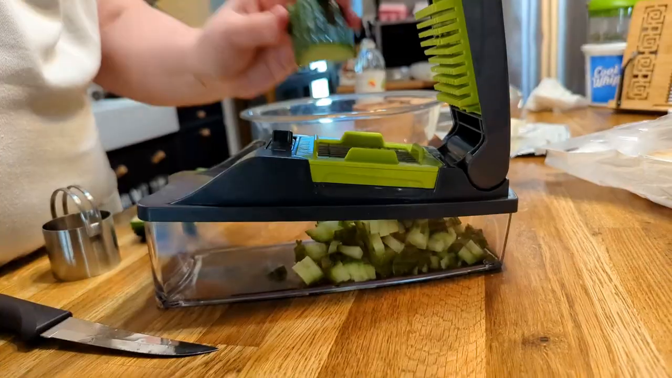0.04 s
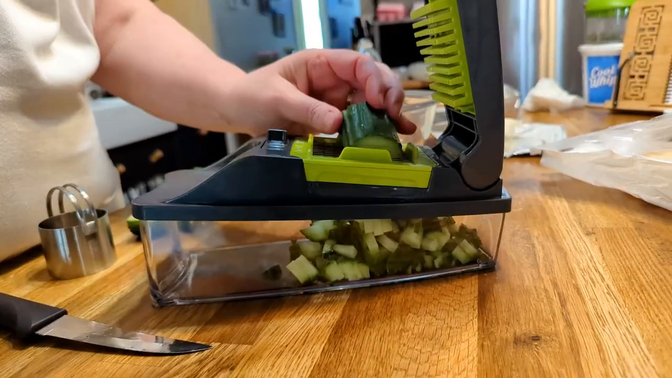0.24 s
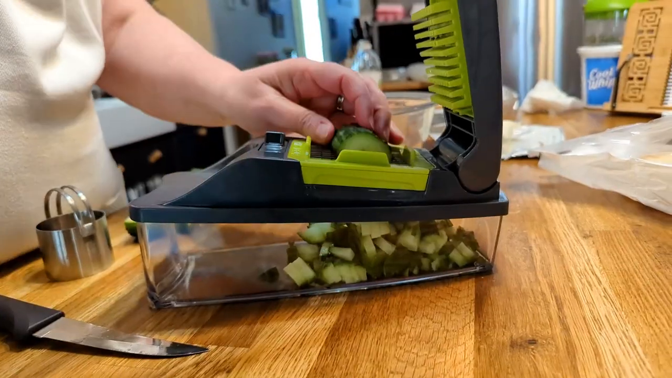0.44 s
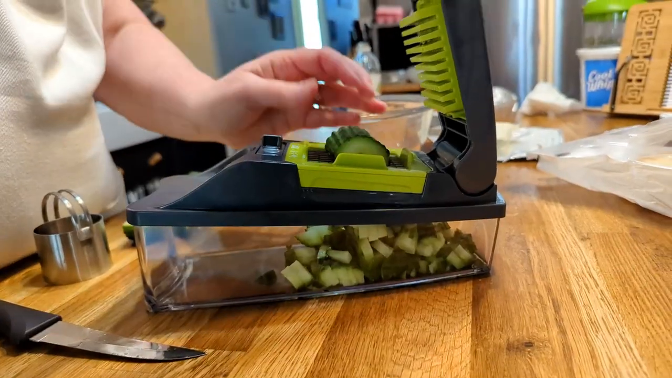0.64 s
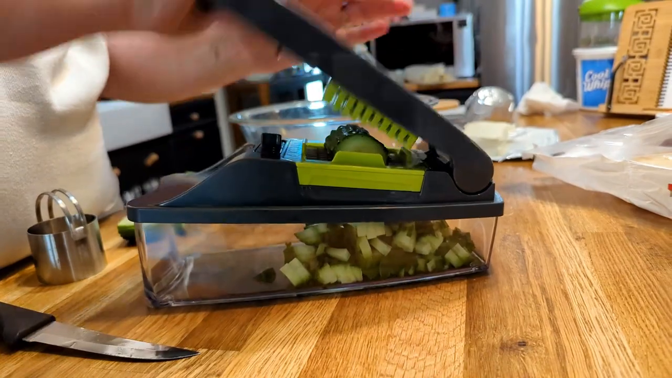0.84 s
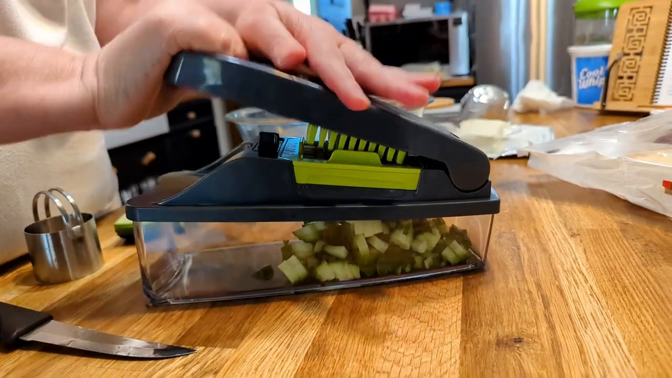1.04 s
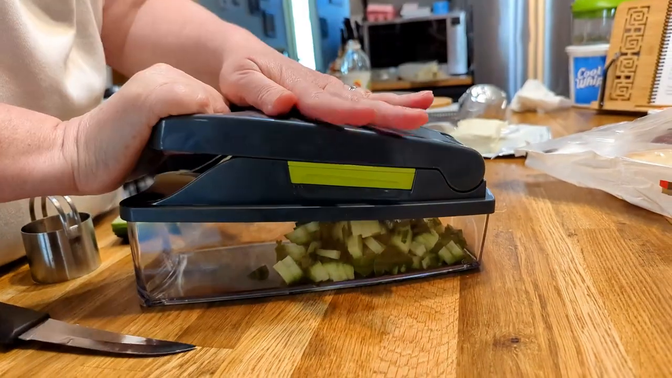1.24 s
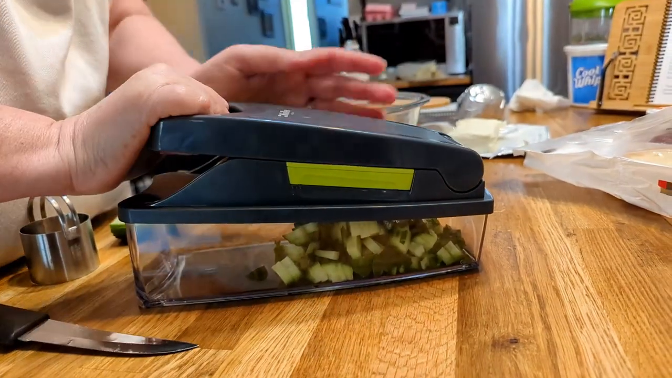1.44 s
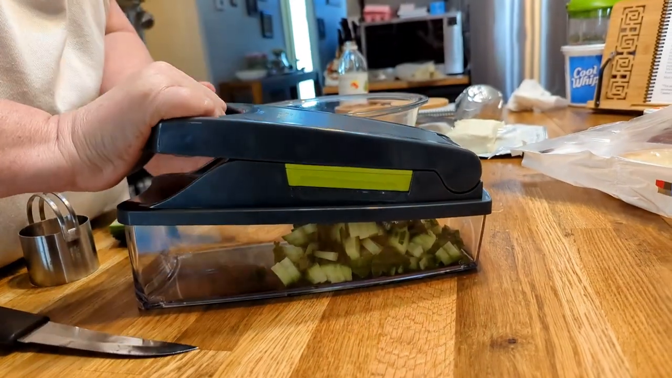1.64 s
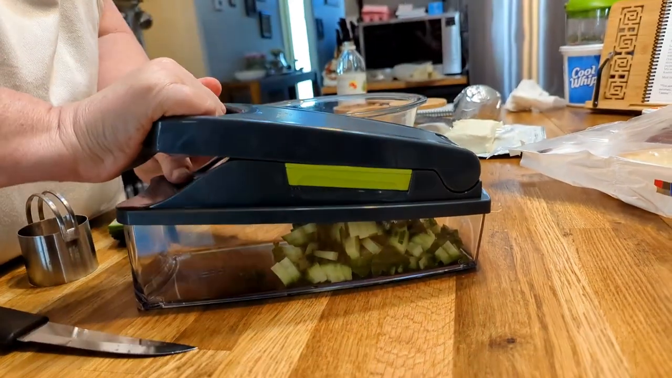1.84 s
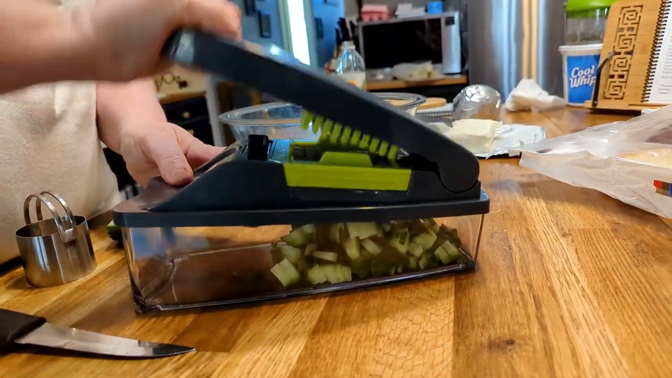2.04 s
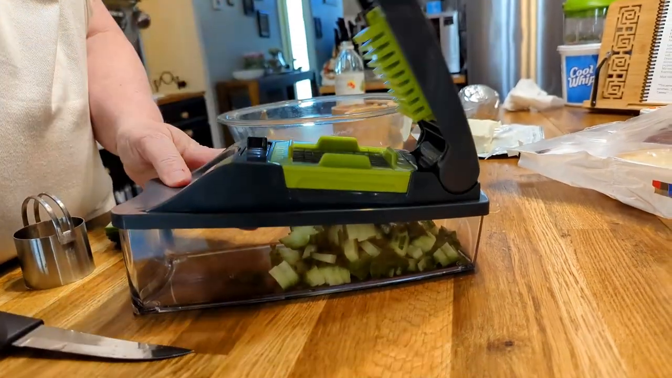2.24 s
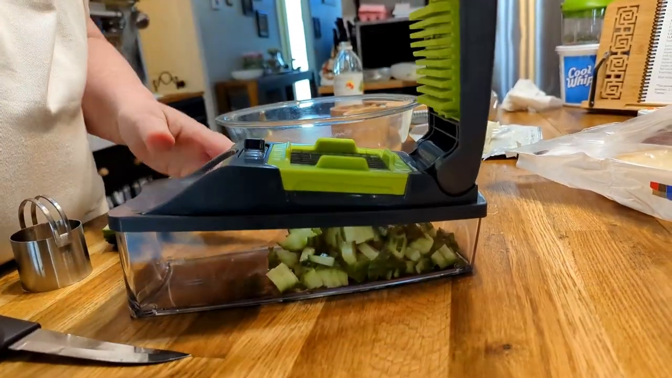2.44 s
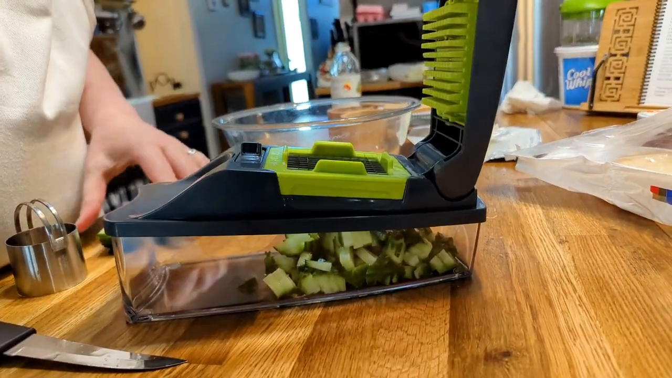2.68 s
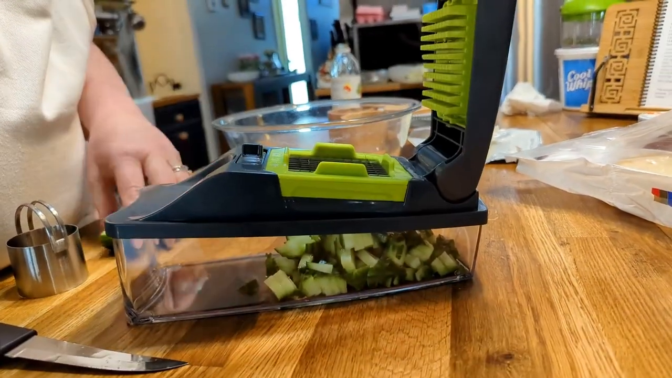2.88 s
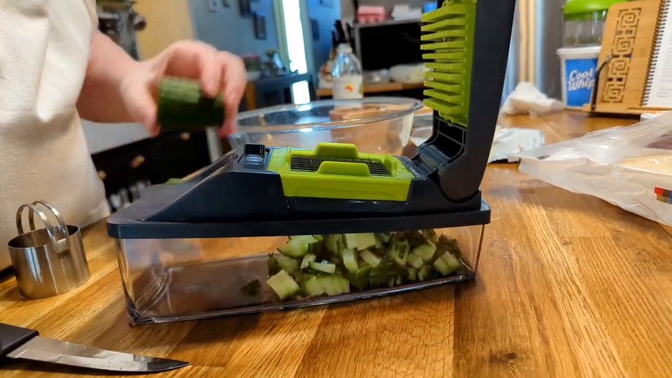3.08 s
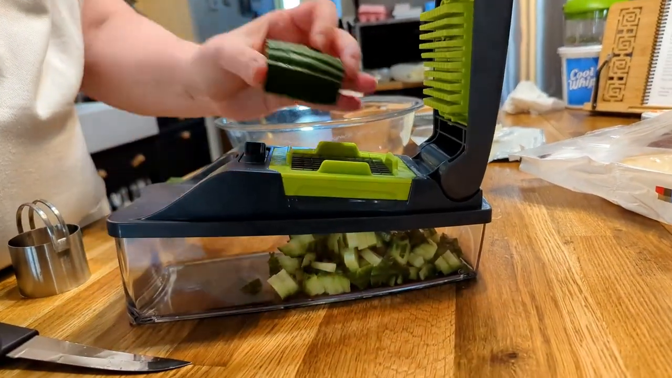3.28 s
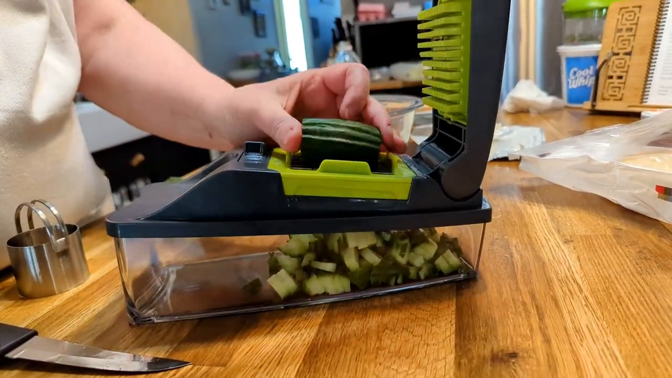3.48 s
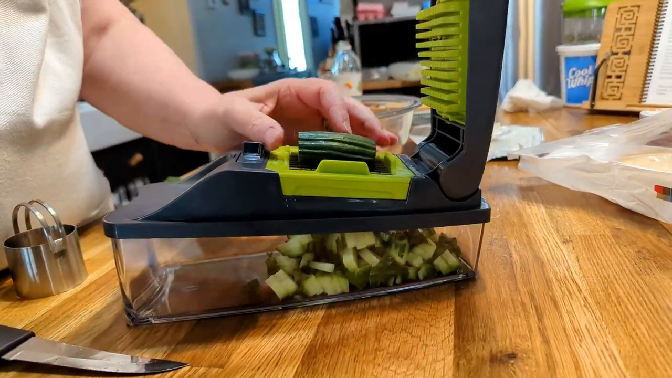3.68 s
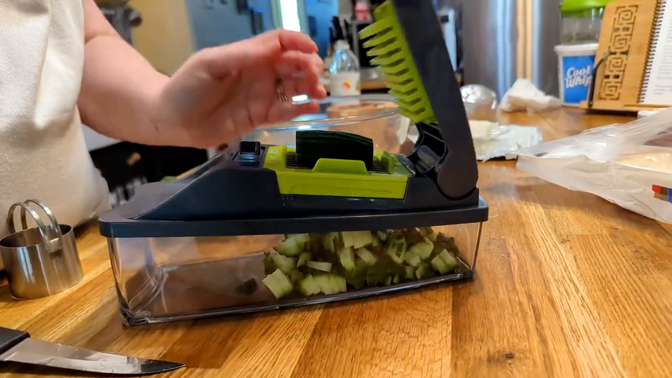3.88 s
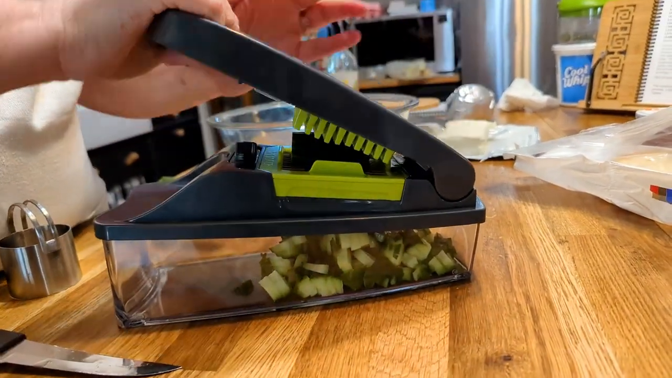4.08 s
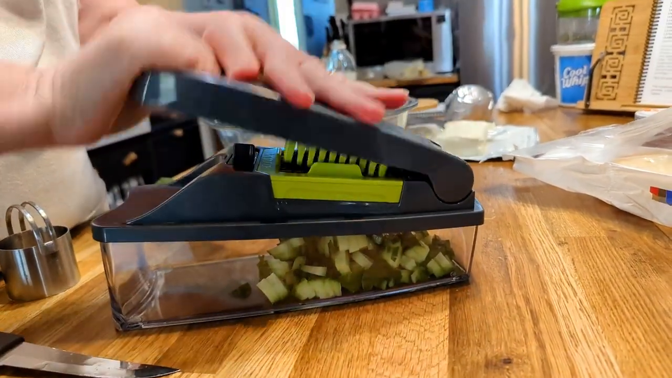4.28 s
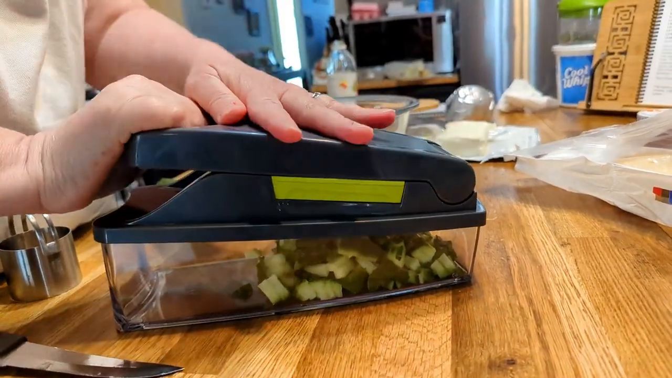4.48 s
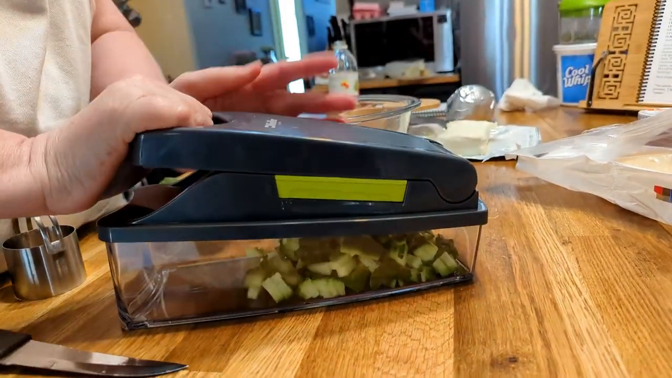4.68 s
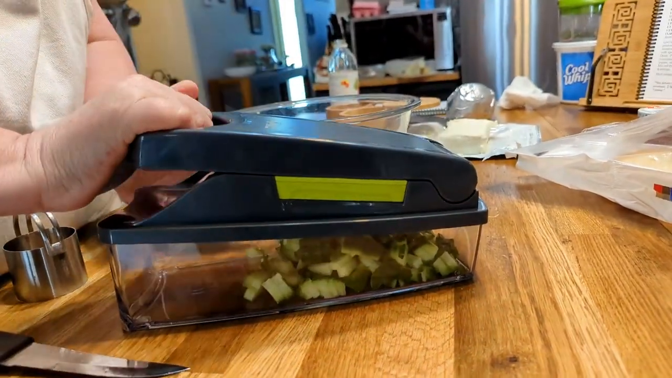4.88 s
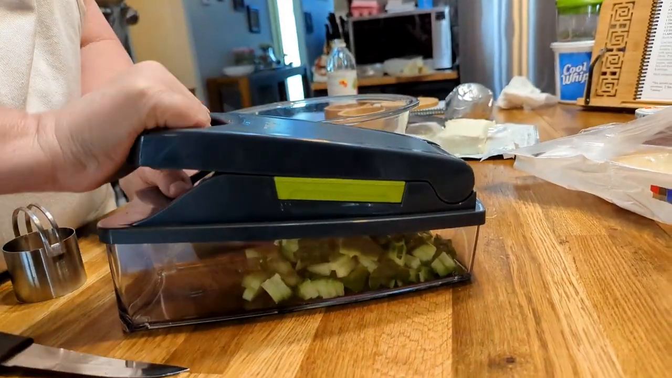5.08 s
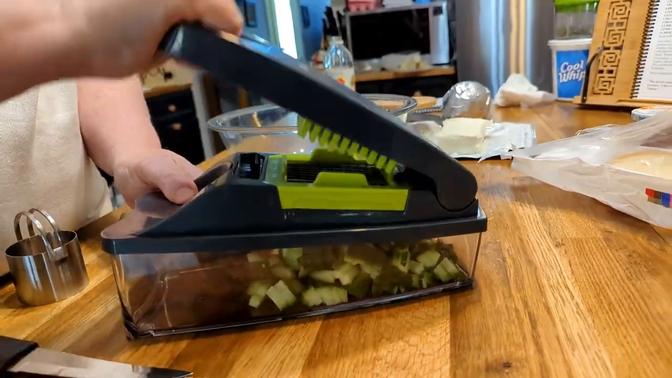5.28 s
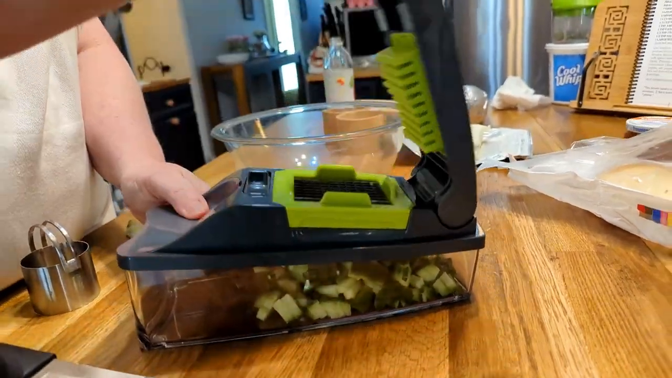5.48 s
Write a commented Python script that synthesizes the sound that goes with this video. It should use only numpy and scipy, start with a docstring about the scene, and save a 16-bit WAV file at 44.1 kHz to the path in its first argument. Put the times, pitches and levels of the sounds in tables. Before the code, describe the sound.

Light cucumber taps, clattering lid and crisp crunch into a hollow tub, then the same cycle again, harder, with a small steel ping between.

```python
"""A plastic lid-press dicer crunches through two pieces of cucumber on a wooden kitchen counter.
Force-driven grains of noise form each crunch; decaying noise bursts form the clacks of cucumber, lid and hinge.
Rubbing and shuddering are softer trains of grains. The hollow tub resonates under every contact.
Decaying sines form one steel ping and a softly singing bowl; nearby surfaces reflect the dicer.
The kitchen adds a diffuse tail, over steady ventilation noise and appliance hum."""
import sys
import numpy as np
from scipy import signal
from scipy.fft import rfft, irfft
from scipy.io import wavfile

SR = 44100
rng = np.random.default_rng(int(sys.argv[2]) if len(sys.argv) > 2 else 0)


def transcribe(signal):
    """Save signal, clipped to [-1, 1], as a 16-bit WAV file at the path in sys.argv[1]."""
    frames = np.atleast_2d(signal).T
    limited = np.clip(frames, -1, 1)
    pcm = np.round(limited * 32767).astype(np.int16)
    wavfile.write(sys.argv[1], SR, pcm)


N = 243431

# Ventilation noise: (frequency [Hz], relative density [dB per Hz]); its overall rms level [dB]
AIR_SPECTRUM = [(15, -73), (25, -36.5), (59, -17.5), (127, -6), (206, -10.5), (301, -10), (394, -18),
                (439, -10), (489, -18), (734, -16), (840, -25), (1400, -25), (2990, -33.5), (16000, -50.5)]
AIR_DB = -61
# Appliance hum: (frequency [Hz], rms level [dB])
HUM_TONES = [(119.5, -70.5), (222, -84.5), (442, -84), (725, -75.5)]
# Kitchen decay: (frequency [Hz], T60 [s])
KITCHEN_DECAY = [(100, 0.5), (400, 0.49), (1200, 0.51), (3000, 0.65), (6000, 0.54), (12000, 0.24)]
# Correlation of the two channels: (frequency [Hz], correlation [0-1])
CHANNEL_LIKENESS = [(150, .995), (330, .9), (600, .58), (1100, .1), (3000, .03), (12000, .03)]
# Early reflections from counter and worktop things: (delay [s], left gain [ratio], right gain [ratio])
EARLY_REFLECTIONS = [(.0009, 0.38, -0.022), (.0016, -0.13, 0.19), (.0034, .22, -0.097), (.0052, .1, .22),
                     (0.0115, 0.21, .15)]
# A bowl on the counter singing after each chop: (time [s], level [dB])
BOWL_TONES = [(1.2, -40.5), (4.42, -50.5)]
BOWL_HZ, BOWL_T60 = 524, 1.58  # Hz, s
# Modes of the ringing steel: (frequency [Hz], relative level [dB], T60 [s], left-right difference [dB])
STEEL_MODES = [(1387, -2, .72, 11), (2494, -11, .14, 2), (2556, -1, .22, 3), (2657, -9, .12, 2),
               (4024, -13, .38, -2), (5612, -6, .38, -2), (6198, -15, .2, 0), (7048, -11, .3, 3),
               (7262, -12, .2, 3), (7379, -9, .24, 3), (7773, -14, .16, 0), (8778, -17, .22, 0),
               (9130, -20, .22, 0), (10030, -24, .2, 0), (11798, -18, .2, 0)]
PING_AT, PING_DB = 3.847, -30  # s, dB
# Modes of the hollow tub and lid: (frequency [Hz], relative gain [dB], T60 [s])
TUB_MODES = [(68.5, 0, 0.36), (163.2, 2.5, 0.28), (223.2, -4, 0.34), (293.9, 5, 0.17), (364.4, 0.5, 0.25),
             (547, -2, 0.16), (640, -6.5, 0.55), (682, -1.5, 0.21), (702, -12, 0.033), (767, -13, 0.62),
             (855, -32, 0.3), (954, -16.5, 0.043), (1210, -23.5, 0.39), (1539, -10.5, 0.017),
             (1910, -14, 0.15)]

# Spectra of the contact voices, low to high: (frequency [Hz], relative density [dB per Hz])
BOOM_VOICE = [(20, -39.5), (35, -26.5), (52, -3.5), (78, 1.5), (100, -3), (160, 3), (230, -1.5),
              (400, -29.5), (1200, -61.5)]
THUD_VOICE = [(25, -59), (100, -45), (170, -15.5), (240, -6), (310, -1.5), (480, 0.5), (700, -9.5),
              (1200, -38), (3000, -70)]
CLACK_VOICE = [(150, -48.5), (400, -11), (600, 0.5), (1000, 0), (1450, 0), (2000, -4.5), (3000, -13.5),
               (5000, -22), (9000, -44.5)]
SNAP_VOICE = [(700, -42), (1800, -1.5), (3000, 7), (4500, 2), (6400, -1), (8200, -7), (10200, -2.5),
              (13000, -2.5), (16000, -13.5)]
# Spectrum of tearing flesh: (frequency [Hz], relative density [dB per Hz])
CRUNCH_VOICE = [(150, -21.5), (420, -9.5), (570, 1.5), (760, -2), (1050, -9.5), (1280, -5), (2000, -12),
                (3200, -27.5), (5000, -31.5), (9000, -49.5)]

# In the contact tables, weight raises the thud, sharpness the snap and push the boom of the counter.
# All levels are relative; each voice has a further trim.
# Fingers and wet plastic rubbing:
# (time [s], length [s], strength [dB], weight [dB], sharpness [dB]); weight raises the boom too
RUB_STROKES = [(0.34, 0.1, -56, 0.5, -12), (0.856, 0.037, -51, -18, -19), (1.415, 0.11, -41, -15, -19.5),
               (1.791, 0.14, -71, 12.5, -10), (1.955, .07, -61.5, 8, -13), (2.438, 0.066, -58, -3, -4.5),
               (2.522, 0.055, -53, -16, -1.5), (2.656, 0.047, -64, -13, -4.5),
               (3.63, 0.13, -69.5, 13, -10.5), (4.257, .05, -53.5, -3.5, -2.5), (4.75, 0.069, -63, -6, -10),
               (4.998, .16, -67.5, 9, -11), (5.37, 0.13, -42.5, -6, -21)]
RUB_ARCH_DB = 5  # a stroke is this much softer at its ends, before its edges fade
# The dicer shuddering after a heavy blow:
# (time [s], length [s], strength [dB], weight [dB], push [dB])
SHUDDER_EVENTS = [(0.95, 0.14, -46, 14, 5.5), (1.31, 0.16, -38, 6, -4), (2.076, 0.14, -38.5, 11, 3),
                  (4.127, 0.16, -49, 4.5, 5), (5.285, 0.091, -31.5, 3.5, 0.5)]
SHUDDER_DB_PER_S = 66.5
# Hinge juddering as the lid swings:
# (time [s], strength [dB], weight [dB], sharpness [dB], push [dB])
HINGE_JUDDERS = [(0.879, -48.5, -22, -14, -28), (0.89, -47.5, -23.5, -15, -35), (2.24, -45.5, -19, -9, -25),
                 (2.292, -43.5, -24, -32, -27), (2.364, -53, -9, -11, -20),
                 (3.973, -33.5, -21.5, -8.5, -14.5), (4.052, -42.5, -30, -25, -35),
                 (5.415, -41.5, -21, -29, -18), (5.463, -38, -10.5, -22, -14)]
# Plastic knocks of lid and tub:
# (time [s], strength [dB], weight [dB], sharpness [dB], push [dB])
PLASTIC_KNOCKS = [(0.918, -37.5, -7, -18, -32), (0.928, -24.5, -5, -3, -18.5),
                  (0.935, -31.5, -10, -20, -18), (1.002, -37.5, -3, -10, -2), (1.142, -34, -13, -4, -17),
                  (1.154, -26.5, -11, 2, -19), (1.171, -36, -3, -2, -10), (1.19, -39, 5.5, -10, 2.5),
                  (1.242, -35, -8, -2, -7), (1.726, -60, -3.5, -5, -7), (1.808, -55, -1.5, -26.5, 0.5),
                  (1.845, -50.5, 2, -16, -0.5), (2.037, -36, 1, -10.5, -4), (2.044, -22, -3, -5.5, -11),
                  (2.064, -28, -1, -11, -22), (2.076, -29, -9, -15.5, -8.5), (2.144, -43.5, -1, -25, 5),
                  (2.814, -64, -5, -14, -25), (3.777, -57.5, -9.5, -24, -14.5),
                  (4.093, -24.5, -17, -12.5, -25.5), (4.109, -39, -16, -5.5, -34),
                  (4.187, -36.5, -2.5, -25, -6), (4.298, -33, 7.5, -16, -1.5), (4.32, -32, -17, -3, -23.5),
                  (4.366, -23, -16, -12, -27), (4.381, -16.5, -16, -2, -18), (4.416, -20.5, -2.5, -15, -7),
                  (4.434, -18.5, -3.5, -15, -9), (4.928, -59.5, -1, -2.5, -16), (5.137, -53, -15, -28, -6),
                  (5.24, -42, 5, -5, -10.5), (5.249, -25, -8.5, -9.5, -24), (5.274, -25, 0.5, -13, -6.5),
                  (5.305, -44, 2, -13, 10.5)]
# Cucumber bumping onto the blade grid:
# (time [s], strength [dB], weight [dB], sharpness [dB], push [dB])
CUCUMBER_BUMPS = [(0.166, -48, -17, -28, -16), (0.209, -43, -2.5, -9.5, -22), (0.22, -46, 1, -18, -16),
                  (0.275, -37.5, -7, -27, -32), (0.621, -52.5, 0.5, -24, -12),
                  (0.698, -43, -20.5, -22, -22), (3.428, -38, -9, -16, -38), (3.452, -34, -9, -9, -20),
                  (3.464, -26.5, -11, -14.5, -22), (3.473, -37, -3, -9.5, -26),
                  (3.613, -46.5, -5, -11.5, -3), (3.623, -45, -2.5, -26, -6)]
CHATTER_DOUBLES_DB = 45  # chatter lasts twice as long for this much less weight
# Below this pitch, each dB of negative weight also takes this many dB from the clack
LIGHT_HZ, LIGHT_DB_PER_DB = 700, 0.44
# Presses through a piece:
# (teeth meet skin [s], skin bursts [s], piece is through [s], force [dB], build-up [dB],
#  crispness [dB], push [dB])
PRESSES = [(1.083, 1.173, 1.2134, -23.5, 23.5, -7.5, -3), (4.287, 4.383, 4.4304, -15, 18.5, -11, -8)]
SNAP_DULLS_DB_PER_S, BOOM_SWELLS_DB_PER_S = 48, 92  # from the burst onward
EASE_DB_PER_S, EASE_S = 184, 0.11  # the force eases once the piece is through


def amp(db):
    """Level definition: amplitude gain is ten to the power of decibels over twenty."""
    return 10 ** (np.asarray(db) / 20)


def unit(x):
    """Mean-square normalisation: scales to rms 1."""
    return x / np.sqrt(np.mean(x ** 2) + 1e-20)


def read(points, hz):
    """Logarithmic frequency scale: interpolates a table between its points."""
    f, value = np.transpose(points)
    return np.interp(np.log(hz + 1), np.log(f), value)


def add(mix, s, sound):
    """Superposition: adds a stereo sound to the mix at time s."""
    part = mix[:, max(round(s * SR), 0):][:, :sound.shape[1]]
    part += sound[:, :part.shape[1]]


def convolve(x, response):
    """Linear filtering: convolves both channels, keeping the length."""
    return signal.fftconvolve(x, np.atleast_2d(response), axes=1)[:, :x.shape[1]]


def colour(points, peak_hz=1000, peak_db=0, peak_octaves=0.96, size=2048):
    """Minimum phase: a causal response from a spectrum, with an optional broad resonance."""
    hz = abs(np.fft.fftfreq(size, 1 / SR))
    peak = peak_db * np.exp(-(np.log2((hz + 1) / peak_hz) / peak_octaves) ** 2)
    log_gain = np.log(amp(read(points, hz) + peak))
    return np.fft.ifft(np.exp(np.conj(signal.hilbert(log_gain)))).real[:size // 2]


def pair(x):
    """Spatial coherence: unrelated channels become alike in the bass, as at two spaced microphones."""
    same = np.clip(read(CHANNEL_LIKENESS, np.fft.rfftfreq(x.shape[1], 1 / SR)), -1, 1)
    mid, side = rfft(x) * np.sqrt([(1 + same) / 2, (1 - same) / 2])
    return irfft(np.array([mid + side, mid - side]), x.shape[1])


def background():
    """Stationary sources: filtered ventilation noise and steady sinusoidal appliance hum."""
    t = np.arange(N) / SR
    air = unit(convolve(pair(rng.standard_normal((2, N))), colour(AIR_SPECTRUM, size=8192)))
    hum = 0
    for hz, db in HUM_TONES:
        hum = hum + amp(db) * np.sqrt(2) * np.sin(2 * np.pi * (hz * t + rng.random()))
    return amp(AIR_DB) * air + hum


def kitchen(x, wet_db, treble_db, build):
    """Diffuse reverberation: a noise tail builds quickly and decays at a frequency-dependent rate."""
    hz, t, z = signal.stft(pair(rng.standard_normal((2, SR))), SR, nperseg=256)
    t60 = read(KITCHEN_DECAY, hz)[:, None]
    treble = amp(read([(2500, 0), (12000, treble_db)], hz))[:, None]
    z = z * np.exp(-np.log(1000) * t / t60) * treble
    tail = signal.istft(z, SR, nperseg=256)[1][:, :SR]
    tail = tail * (1 - np.exp(-(np.arange(SR) / SR / build) ** 2))
    energy_scale = np.sqrt(2 * np.log(1000) / (t60.mean() * SR))
    return amp(wet_db) * convolve(x, tail * energy_scale)


def reflect(x):
    """Comb filtering: nearby surfaces add a few quick copies that interfere with the direct sound."""
    out = x.copy()
    for delay, left, right in EARLY_REFLECTIONS:
        add(out, delay, np.array([[left], [right]]) * x)
    return out


def bowl():
    """Lightly damped resonance: one slowly dying tone, shaken up through the counter."""
    t, out = np.arange(2 * SR) / SR, np.zeros((2, N))
    envelope = (1 - np.exp(-t / .02)) * np.exp(-np.log(1000) * t / BOWL_T60)
    tone = envelope * np.sin(2 * np.pi * BOWL_HZ * t)
    for s, db in BOWL_TONES:
        add(out, s, amp(db) * np.array([tone, tone]))
    return out


def ping(tick_db=-5, tick_s=0.017, twin_db=-8, split_hz=25, rise=0.00054):
    """Inharmonic modes: steel rings with a bright tick; all modes but the first are beating pairs."""
    t = np.arange(SR) / SR
    tick = unit(convolve(rng.standard_normal((2, SR)), colour(SNAP_VOICE)))
    ring = amp(tick_db) * tick * np.exp(-t / tick_s)
    for k, (hz, db, t60, pan_db) in enumerate(STEEL_MODES):
        main_phase, twin_phase = 2 * np.pi * rng.random((2, 2, 1))
        wave = np.sin(2 * np.pi * hz * t + main_phase / 4)
        if k > 0:
            twin_hz = hz + split_hz * rng.normal()
            wave += amp(twin_db) * np.sin(2 * np.pi * twin_hz * t + twin_phase)
        pan = amp([[pan_db / 2], [-pan_db / 2]])
        ring += amp(db) * pan * wave * np.exp(-np.log(1000) * t / t60)
    out = np.zeros((2, N))
    add(out, PING_AT, amp(PING_DB) * ring * (1 - np.exp(-t / rise)))
    return out


def tub(x, ring_db=5):
    """Modal resonance: every contact excites the damped tub; ring_db is the gain of a 0 dB mode."""
    t = np.arange(SR) / SR
    response = np.zeros((2, SR))
    for k, (hz, db, t60) in enumerate(TUB_MODES):
        damping = np.log(1000) / t60
        # higher modes reach the two microphones out of step
        lag = (-1) ** k * np.arccos(read(CHANNEL_LIKENESS, hz)) * np.array([[.5], [-.5]])
        mode = np.exp(-damping * t) * np.cos(2 * np.pi * hz * t + lag)
        response += amp(db + ring_db) * 2 * damping / SR * mode
    return convolve(x, response)


def gate(start, end, attack, release):
    """Exponential onset and decay: full between start and end."""
    t = np.arange(N) / SR
    return np.exp(np.clip(np.minimum((t - start) / attack, (end - t) / release), -20, 0))


def grains(response, per_s, spread_db):
    """Shot noise: a random train of tiny snaps of uneven size, rms 1."""
    size = amp(spread_db * np.minimum(rng.exponential(1, N), 3.5))
    clicks = (rng.random(N) < per_s / SR) * size
    # each click's power dies with a 2.1 ms time constant
    power = signal.lfilter([1], [1, -np.exp(-1 / (0.0021 * SR))], clicks ** 2)
    noise = pair(rng.standard_normal((2, N)))
    return unit(convolve(noise * np.sqrt(power + 1e-12), response))


def grainy(levels, voices, trims_db, per_s, spread_db):
    """Superposed voices: independent grains in each voice follow that voice's level."""
    total = 0
    for level, voice, db in zip(levels, voices, trims_db):
        total = total + amp(db) * level * grains(colour(voice), per_s, spread_db)
    return total


def rubs(attack=0.024, release=.01):
    """Sliding friction: each stroke swells and fades in one arch of grains."""
    t, levels = np.arange(N) / SR, np.zeros((4, N))
    for s, length, db, weight, sharp in RUB_STROKES:
        arch = np.sin(np.pi * np.clip((t - s) / length, 0, 1))
        stroke = amp(db + RUB_ARCH_DB * (arch - 1)) * gate(s, s + length, attack, release)
        levels += amp([[weight], [weight], [0], [sharp]]) * stroke
    return grainy(levels, [BOOM_VOICE, THUD_VOICE, CLACK_VOICE, SNAP_VOICE],
                  trims_db=[-8.5, -9, -5, -2.0], per_s=1000, spread_db=1.8)


def shudders(attack=.015, release=.012):
    """Repeated small impacts: tub, lid and loose cubes rattle and settle."""
    t, levels = np.arange(N) / SR, np.zeros((4, N))
    for s, length, db, weight, boom in SHUDDER_EVENTS:
        settling_db = db - SHUDDER_DB_PER_S * np.maximum(t - s, 0)
        fade = amp(settling_db) * gate(s, s + length, attack, release)
        levels += amp([[boom], [weight], [0], [0]]) * fade
    return grainy(levels, [BOOM_VOICE, THUD_VOICE, CLACK_VOICE, SNAP_VOICE],
                  trims_db=[-8.5, -9.5, -3.5, -17], per_s=1000, spread_db=-0.5)


def chatter(response, length, rise, size=6144):
    """Contact bounce: a swelling, then dying noise burst in one voice, rms 1; length is its T60."""
    t = np.arange(size) / SR
    fade = (1 - np.exp(-t / rise)) ** 2 * np.exp(-np.log(1000) * t / abs(length))
    return unit(convolve(pair(rng.standard_normal((2, size))) * fade, response))


def knocks(rows, clack_hz, chatter_s, boom_db, thud_db, clack_db, snap_db, spot_db=7,
           thud_stretch=1.07, snap_stretch=0.99, rise=.001, snap_rise=0.0009,
           pan_db=-1.72, graze_db=-18, graze_s=.0035):
    """Impact: a push on the counter plus chatter; weight adds thud and shortens the chatter."""
    out, push = np.zeros((2, N)), colour(BOOM_VOICE, size=8192)
    push = np.array([push, push]) / abs(push).max()
    low, high = colour(THUD_VOICE), colour(SNAP_VOICE)
    for s, db, weight, sharp, boom in rows:
        length = chatter_s * 2 ** (-weight / CHATTER_DOUBLES_DB)
        light_db = LIGHT_DB_PER_DB * min(weight, 0)
        clack = [(hz, level + (hz < LIGHT_HZ) * light_db) for hz, level in CLACK_VOICE]
        spot = colour(clack, peak_hz=clack_hz, peak_db=spot_db)
        pan = amp([[pan_db], [-pan_db]])
        bright = amp(db + clack_db) * pan * chatter(spot, length, rise)
        bright += amp(db + sharp + snap_db) * chatter(high, length * snap_stretch, snap_rise)
        add(out, s - graze_s, amp(graze_db) * bright)  # the surfaces graze just before they meet fully
        add(out, s, bright)
        add(out, s, amp(db + weight + thud_db) * chatter(low, length * thud_stretch, rise))
        add(out, s, amp(db + boom + boom_db) * push)
    return out


def crunches(attack=0.0031, release=.01, tear_s=0.009):
    """Brittle fracture: skin crackles under load, flesh tears, snap yields to boom and force eases."""
    t, levels = np.arange(N) / SR, np.zeros((5, N))
    for meet, burst, through, db, build_db, crisp, boom in PRESSES:
        load_db = np.interp(t, [meet, burst], [-build_db, 0])
        load_db -= EASE_DB_PER_S * np.maximum(t - through, 0)
        force = amp(db + load_db) * gate(meet, through + EASE_S, attack, release)
        torn = gate(burst, np.inf, tear_s, release)
        depth = np.clip(t, burst, through + EASE_S) - burst  # time since the burst stands for depth
        swell_db = BOOM_SWELLS_DB_PER_S * depth
        snap = amp(crisp - SNAP_DULLS_DB_PER_S * depth)
        levels += force * np.array([amp(boom + swell_db), amp(swell_db / 2), torn, 1 - torn, snap])
    return grainy(levels, [BOOM_VOICE, THUD_VOICE, CRUNCH_VOICE, CLACK_VOICE, SNAP_VOICE],
                  trims_db=[-22.5, -15.5, -3.5, -4.5, -2.5], per_s=660, spread_db=3.0)


def scene():
    """Source, resonator and room: contacts excite the tub, a little to the right, then the kitchen."""
    cuts = crunches()
    cucumber = knocks(CUCUMBER_BUMPS, clack_hz=990, chatter_s=.03, boom_db=5, thud_db=-10.0,
                      clack_db=-9.5, snap_db=-13)
    plastic = knocks(PLASTIC_KNOCKS, clack_hz=890, chatter_s=0.026, boom_db=6, thud_db=-10.0,
                     clack_db=-10.0, snap_db=-13.5)
    hinge = knocks(HINGE_JUDDERS, clack_hz=1000, chatter_s=.05, boom_db=6, thud_db=-10.5,
                   clack_db=-9.5, snap_db=-13.5, spot_db=6.5, rise=0.0039, snap_rise=.003)
    contact = cucumber + plastic + hinge + cuts + shudders() + rubs()
    # long waves bend round small surfaces, so only the rest is reflected
    bass = signal.sosfiltfilt(signal.butter(2, 500, fs=SR, output="sos"), contact)
    dicer = (bass + reflect(contact - bass) + tub(contact)) * amp([[-.3], [.3]])
    steel = ping()
    room_input = dicer + amp(2.5) * cuts + amp(-3) * steel
    room = kitchen(room_input, wet_db=-11, treble_db=3, build=0.0072)
    return dicer + steel + bowl() + room + background()


def record(dry):
    """Saturation and band limiting: rounds off the loudest peaks, then low-passes at 16.1 kHz."""
    rounded = dry / (1 + (dry / .92) ** 6) ** (1 / 6)
    lowpass = signal.firwin(301, 16100, window=("kaiser", 9), fs=SR)
    return signal.oaconvolve(rounded, lowpass[None], "same", axes=1)


dry = scene()
out = record(dry)
transcribe(out)
```